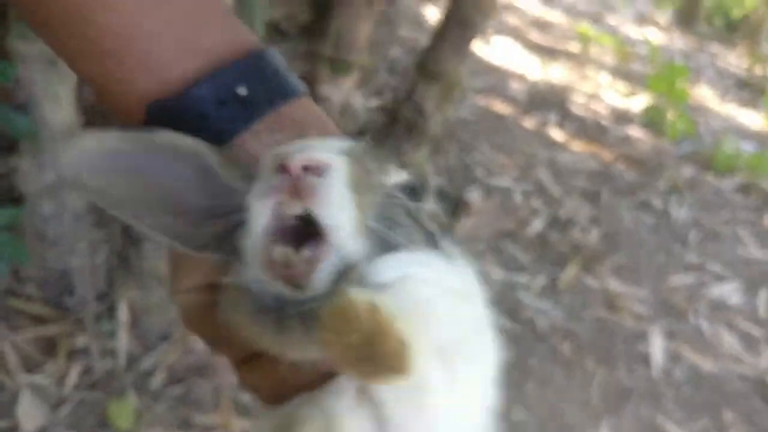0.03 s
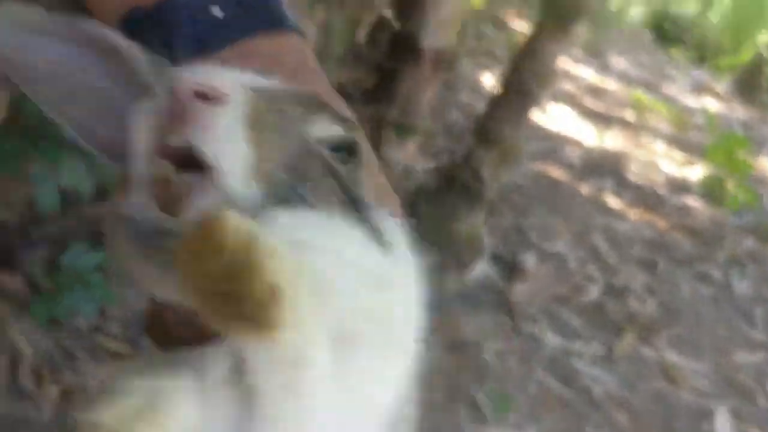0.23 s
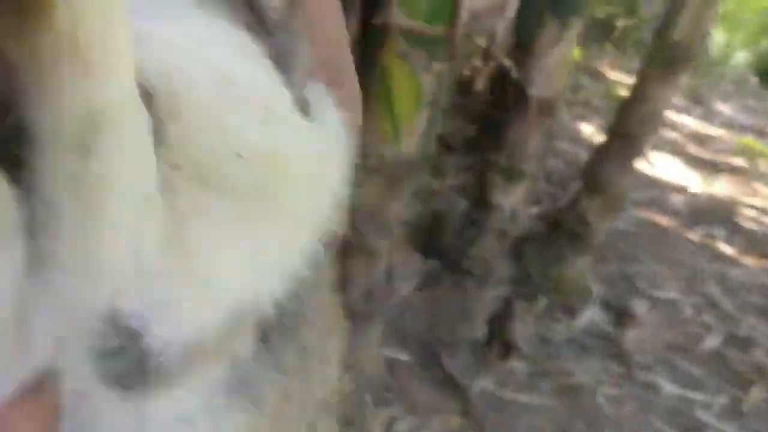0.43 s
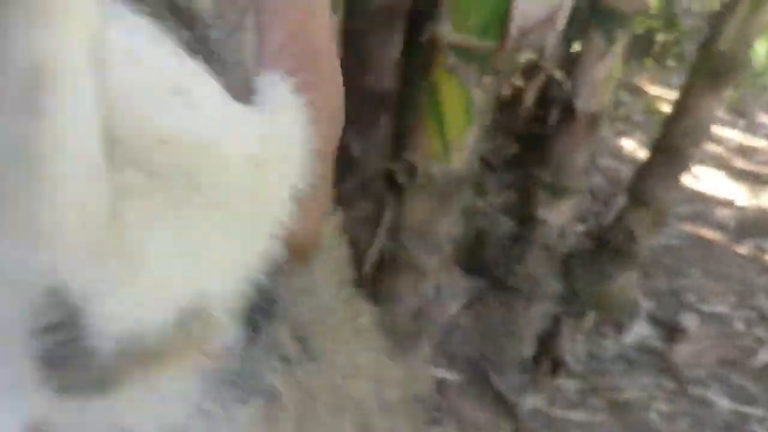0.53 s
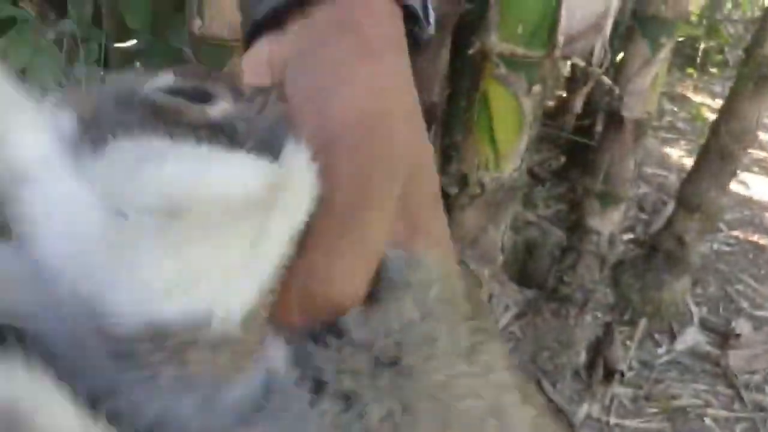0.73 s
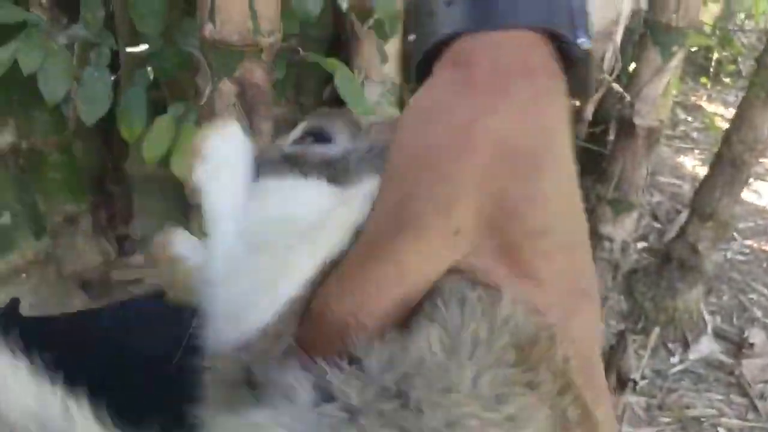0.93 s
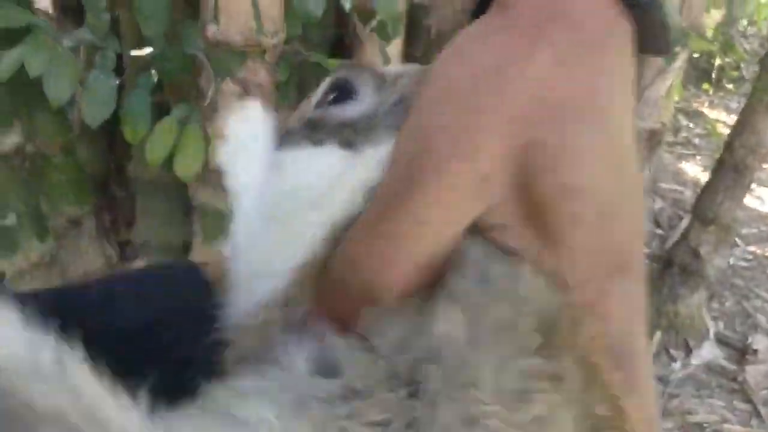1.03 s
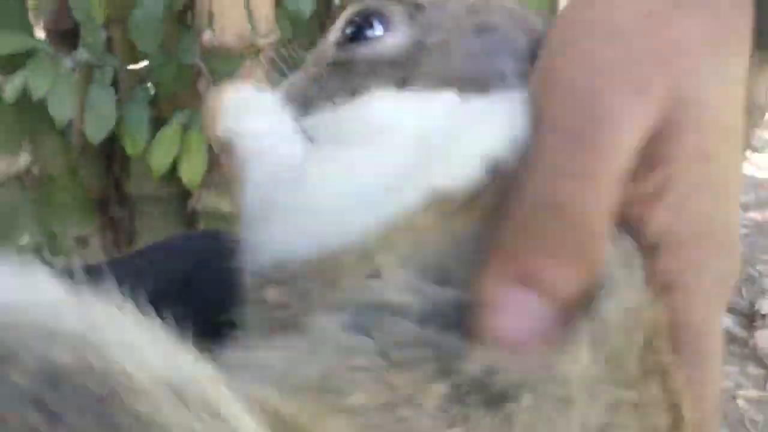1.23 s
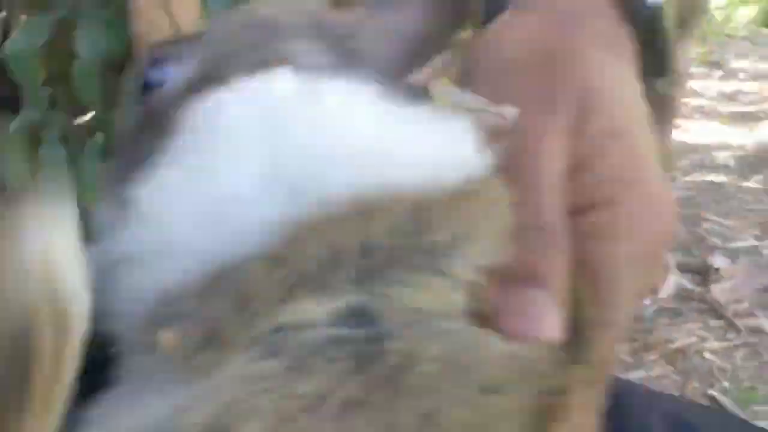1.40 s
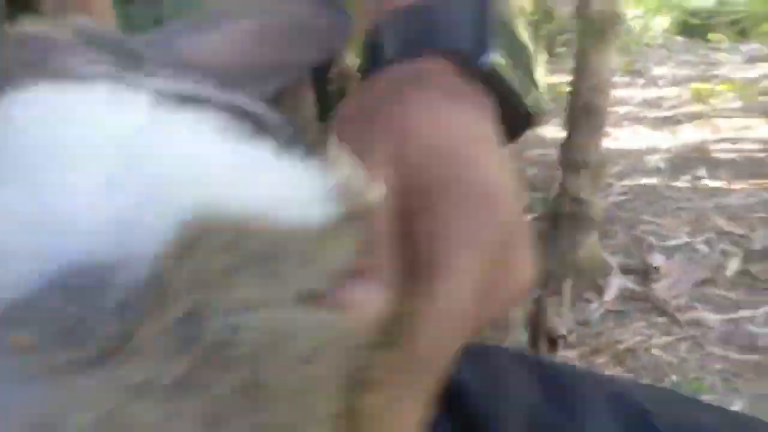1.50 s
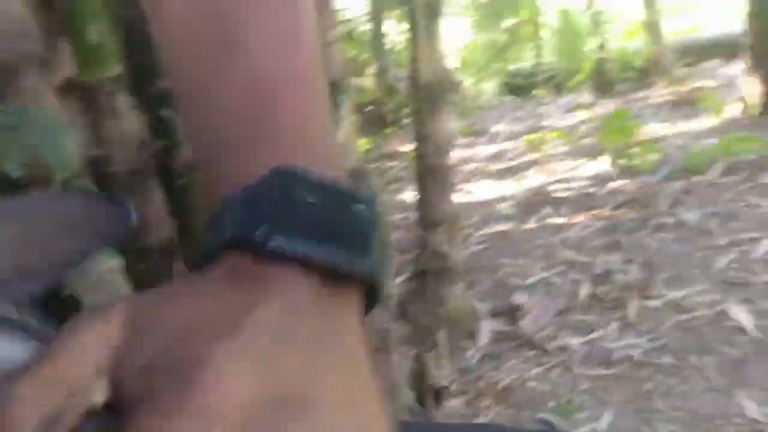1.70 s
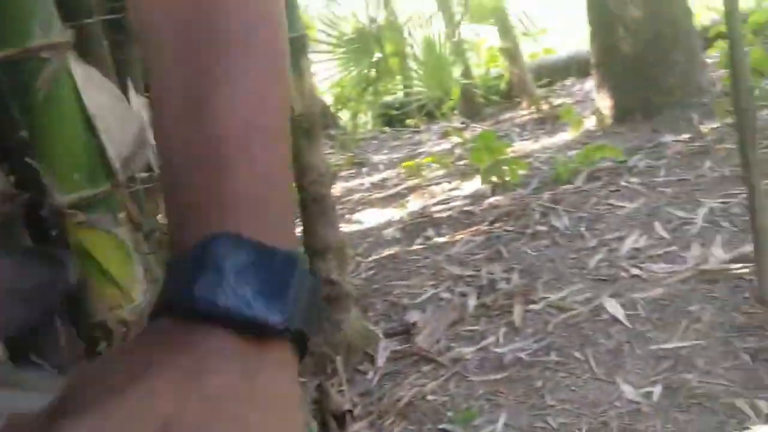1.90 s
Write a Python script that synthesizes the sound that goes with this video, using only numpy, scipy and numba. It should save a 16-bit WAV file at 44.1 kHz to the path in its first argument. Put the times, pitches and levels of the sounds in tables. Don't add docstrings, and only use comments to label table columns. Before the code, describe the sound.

A rabbit held very close to a handheld phone microphone gives three loud, piercing squeals with short gaps, the first clean then rasping, the later ones rougher; faint woodland rumble, leaf hiss and slight handling rustles lie beneath.

```python
import sys
import numpy as np
from scipy import signal
from scipy.fft import rfft, irfft, next_fast_len
from scipy.io import wavfile
from scipy.ndimage import uniform_filter1d
from numba import njit

SR = 44100
rng = np.random.default_rng(int(sys.argv[2]) if len(sys.argv) > 2 else 0)


def voltage_ratio(level):
    return 10 ** (np.asarray(level, float) / 20)


def materialize(psi):
    bounded = np.clip(np.atleast_2d(psi).T, -1, 1)
    quanta = np.round(bounded * 32767).astype(np.int16)
    wavfile.write(sys.argv[1], SR, quanta)


N = 85995


def curve(rows, col, smooth_s=0.0013):
    rows = np.array(rows, float)
    line = np.interp(np.arange(N) / SR, rows[:, 0], rows[:, col])
    return uniform_filter1d(line, max(int(smooth_s * SR), 1))


def colour(x, points):
    p, n = np.array(points, float), next_fast_len(N + 2048)
    hz = np.maximum(np.arange(n // 2 + 1) * SR / n, 1)
    gain_db = np.interp(np.log(hz), np.log(p[:, 0]), p[:, 1])
    return irfft(rfft(x, n) * voltage_ratio(gain_db), n)[..., :N]


def unit(x):
    return x / np.sqrt(np.mean(x ** 2))


def still(hz):
    return np.full(N, float(hz))


@njit
def svf(x, hz, width):
    y, b, l = np.empty(len(x)), 0., 0.
    for i in range(len(x)):
        g, k = np.tan(np.pi * hz[i] / SR), width / hz[i]
        v = (b + g * (x[i] - l)) / (1 + g * (g + k))
        b, l, y[i] = 2 * v - b, l + 2 * g * v, k * v
    return y


def twice(x, hz, width):
    return svf(svf(x, hz, 1. * width), hz, 1. * width)


def walk(rate_hz):
    slow_filter = signal.butter(2, rate_hz, fs=SR, output="sos")
    return unit(signal.sosfilt(slow_filter, rng.standard_normal(N + SR))[SR:])


def vocal_folds(chaos, beat):
    # (time [s], pitch [Hz])
    fold_pitch = [(.14, 1200), (.17, 1464), (.2, 1616), (.25, 1657), (.325, 1502), (.385, 1692),
                  (.43, 1623), (.462, 1665), (.476, 1539), (.49, 1599), (.515, 1830), (.527, 1479),
                  (.56, 1576), (.585, 1477), (.613, 1337), (.632, 1026), (.78, 909.8), (.826, 1304),
                  (.88, 1673), (.94, 1741), (.97, 1554), (1.08, 1552), (1.15, 1384), (1.165, 853),
                  (1.19, 718.7), (1.408, 535.1), (1.428, 1139), (1.437, 1651), (1.48, 1871), (1.543, 1837),
                  (1.556, 1748), (1.62, 1815), (1.685, 1762), (1.725, 1495), (1.76, 1350)]
    # (time [s], cycles [count])
    sub_beats = np.array([
        (0, 2),
        (1.3, 9),
        (1.5, 4),
    ])
    jitter, shimmer, chaos_hz = .3, 0.46, 591.8
    t = np.arange(N) / SR
    hz = curve(fold_pitch, 1, 0.011)
    steady = 2 * np.pi * np.cumsum(hz) / SR
    phase = steady + 2 * np.pi * np.cumsum(hz * jitter * chaos * walk(chaos_hz)) / SR

    folds = np.zeros(N)
    for k in range(1, 17):
        below_17k = np.clip((17000 - k * hz) / 1000, 0, 1)
        folds += k ** -0.85 * np.cos(k * phase) * below_17k

    now = np.searchsorted(sub_beats[:, 0], t, "right") - 1
    slow = phase / sub_beats[now, 1] + 2.23 * chaos * walk(90)
    pulse = 5.74 * np.exp(2 * (np.cos(slow) - 1))
    folds = folds * (1 + shimmer * chaos * np.tanh(walk(chaos_hz)))
    return folds * (1 + beat * (pulse - 1)), phase, steady


def upper_head(air):
    # (mean centre [Hz], width [Hz], mean level [dB])
    bones = [(1000, 1800, -17), (8200, 3500, -13), (12000, 7000, -20)]
    # (time [s], mouth resonance [Hz], mouth level [dB], nose level [dB])
    upper_mouth = [(.15, 4910, -14.5, -0.5), (.49, 4970, -31.5, 19), (.58, 4940, 8, 4.5),
                   (.79, 3960, 15.5, 19.5), (.87, 5540, 2, -6), (.98, 5120, 1.5, -23), (1.1, 5160, 2, 13.5),
                   (1.17, 5310, 8.5, 16), (1.42, 5260, -2, -4), (1.47, 5020, 3.5, 12),
                   (1.6, 5220, -5.5, -32.5), (1.67, 5490, 6, 0.5), (1.76, 4840, 5, 14.5)]
    ringing = np.zeros(N)
    for f, width_hz, db in bones:
        wavering_db = db + 1.78 * walk(29.5)
        wavering_hz = f * (1 + 0.15 * walk(5.4))
        ringing += voltage_ratio(wavering_db) * twice(air, wavering_hz, width_hz)
    palate = voltage_ratio(curve(upper_mouth, 2)) * twice(air, curve(upper_mouth, 1), 890)
    nose = voltage_ratio(curve(upper_mouth, 3)) * twice(air, still(3343), 757)
    return ringing + palate + nose


def rabbit():
    # (time [s], mouth resonance [Hz], chaos [0-1], sub-beat depth [0-1], brightness [dB])
    throat = [(.14, 3140, 0.03, 0, -38), (.47, 3140, .01, 0.01, -29), (.49, 3210, 0.01, 0.07, -19),
              (.505, 3225, 0.22, 0.6, -37), (.525, 2990, 0.17, 0.93, -4.5), (.556, 3113, 0.37, 0.89, -2),
              (.585, 3166, .2, 0.46, -9), (.63, 2400, .2, 0, -8), (.78, 970, 0.8, 0.7, -23.5),
              (.82, 1842, 0.82, 0, -27.5), (.87, 2420, 0.87, 0.36, -16), (.95, 2668, 0.66, 0.37, -12.5),
              (.995, 2387, 0.7, 0, -13), (1.06, 2434, 0.51, 0.11, -7.5), (1.15, 2277, 0.57, 0.27, -12.5),
              (1.19, 2250, 0.28, 0.3, -4), (1.41, 960, .1, 0.1, -14), (1.436, 1910, 0.34, 0, -12),
              (1.478, 2247, .35, 0.23, -26.5), (1.486, 1983, 0.03, 0, -9), (1.542, 1830, 0.02, 0, -3.5),
              (1.552, 2116, 0.14, 0.4, -15), (1.61, 2265, 0.22, 0.27, -15.5), (1.65, 2530, 0.8, 0.6, -14),
              (1.69, 2315, .6, 1, -11.5), (1.715, 2270, 0.41, 0.3, -15.5), (1.76, 2150, 0.69, 1, -10)]
    # (time [s], ring [dB], chest [dB])
    ring_and_chest = [(.47, -33, -40), (.55, -3.5, -21.5), (.79, -6, -14), (.87, 1, -27.5), (1.0, -5, -16),
                      (1.06, 17, -14), (1.17, 13.5, -9), (1.42, -8, -7.5), (1.5, -8.5, -22),
                      (1.6, 4.5, -9.5), (1.65, -4, -13.5), (1.75, 9, -5.5)]
    # (time [s], level [dB])
    effort = [(.13, -72.5), (.15, -34.5), (.178, -25), (.31, -27), (.38, -20), (.43, -22), (.478, -21),
              (.505, -10), (.57, -13), (.617, -22), (.632, -33.5), (.65, -94), (.772, -56.5), (.789, -24),
              (.82, -17.5), (.855, -11.5), (.945, -15.5), (.985, -23.5), (1.058, -16), (1.1, -18),
              (1.165, -18.5), (1.19, -38), (1.205, -48), (1.406, -98), (1.414, -31.5), (1.468, -22),
              (1.535, -22), (1.57, -15), (1.67, -19), (1.705, -18), (1.74, -25.5), (1.765, -45),
              (1.78, -75)]
    chaos, beat = np.clip(curve(throat, 2), 0, 1), curve(throat, 3)
    folds, phase, steady = vocal_folds(chaos, beat)

    breath = (chaos + 0.014) * (1 + np.cos(phase)) * rng.standard_normal((3, N))
    air = folds + voltage_ratio(-12) * breath[0]
    airy = folds + voltage_ratio(9) * (0.48 * breath[0] + breath[1:])

    mouth_hz = curve(throat, 1) * (1 + 0.032 * chaos * walk(91))
    mouth = twice(air, mouth_hz, 520)
    wide_mouth = 1.08 * beat * twice(air, 0.97 * mouth_hz, 1100)
    skull = voltage_ratio(curve(throat, 4)) * np.array([upper_head(a) for a in airy])
    fold_tone = voltage_ratio(-9) * np.cos(steady + 2.36 * chaos * walk(130)) * voltage_ratio(-6 * chaos)
    narrow_ring = voltage_ratio(curve(ring_and_chest, 1)) * twice(air, mouth_hz, 300)
    chest = voltage_ratio(curve(ring_and_chest, 2)) * twice(airy.mean(0), still(1000), 1800)

    voice = mouth + wide_mouth + skull + fold_tone + narrow_ring + chest
    voice = colour(voice, [(250, -5), (600, -7), (6100, 3), (6600, -3), (7200, 3.5)])
    voice = voice / np.sqrt(uniform_filter1d(np.mean(voice ** 2, 0), size=900))
    return voice * voltage_ratio(curve(effort, 1))


def at_port(voice, side):
    # (frequency [Hz], level [dB])
    port_balance = [(900, 4), (1600, -12.5), (2300, -2), (4000, 1), (6500, 8.5), (8000, 6), (15000, 21.5)]
    # (time [s], at 4-7 kHz [dB], at 2-3.4 kHz [dB])
    head_turn = [(.2, 5.5, 0), (.35, 5, -7.5), (.45, 4.5, 2.5), (.57, 4, -2.5), (.85, 1.5, -0.5),
                 (.95, -14, 12), (1.02, -9, 0.5), (1.17, -5.5, 3), (1.44, -6.5, 1.5), (1.53, 10, 2),
                 (1.68, -6, 1)]
    # (time [s], phase [rad])
    phase_swing = [(.91, 0.5), (.98, -2), (1.15, -2), (1.3, 0.5), (1.42, 3), (1.46, 3), (1.5, 0.5)]
    # (frequency [Hz], phase [rad])
    left_lead = [(900, 0.63), (1600, 3.7), (2240, 5.36), (3360, 6.79), (5700, 10.75), (16000, 23.4)]
    n = next_fast_len(N + 2048)
    high = colour(voice, [(3700, -21), (4400, 0), (6800, 0), (7400, -30)])
    middle = colour(voice - high, [(1850, -40), (2050, 0), (3300, 0), (3600, -40)])
    swung = np.real(signal.hilbert(middle, n)[:N] * np.exp(.5j * side * curve(phase_swing, 1)))

    high_gain = voltage_ratio(side * curve(head_turn, 1) / 2)
    middle_gain = voltage_ratio(side * curve(head_turn, 2) / 2)
    turned = voice + (high_gain - 1) * high + middle_gain * swung - middle
    heard = colour(turned, [(f, side * d / 2) for f, d in port_balance])
    lead = np.interp(np.arange(n // 2 + 1) * SR / n, *np.array(left_lead, float).T)
    return irfft(rfft(heard, n) * np.exp(.5j * side * lead), n)[:N]


def trunk_echo(voice):
    t60_s, first_return_s = 0.18, .004
    tail = np.arange(SR // 2) / SR
    fade = np.exp(-np.log(1000) * tail / t60_s) * (tail > first_return_s)
    trunks = rng.standard_normal(len(tail)) * fade
    trunks = trunks / np.sqrt(np.sum(trunks ** 2))
    return signal.fftconvolve(svf(voice, still(2400), 2500.), trunks)[:N]


def rustles():
    # (time [s], level [dB], centre [Hz])
    brushes = [
        (0.02, -51.5, 1300),
        (1.3, -34, 56),
        (0.347, -39.5, 212),
        (0.67, -42, 147.6),
        (1.291, -80, 2510),
    ]
    t, out = np.arange(N) / SR, np.zeros(N)
    for s, db, hz in brushes:
        puff = np.exp(-((t - s) / 0.016) ** 2)
        out += voltage_ratio(db) * puff * unit(svf(rng.standard_normal(N), still(hz), 1. * hz))
    return out


def wood():
    # (time [s], level [dB])
    leaf_breeze = [(0, 1.5), (.2, 4), (.65, 0.5), (1.22, -7), (1.3, 2.5), (1.95, -2.5)]
    # (frequency [Hz], level [dB])
    wood_colour = [(32, -2), (50, 2), (215, -11), (400, -17.5), (950, -19.5), (2100, -24.5), (7500, -47.5),
                   (13000, -41)]
    out, gust_db = np.zeros((2, N)), 1 * walk(1.0)
    for hz in 40 * 2 ** np.arange(0, 9, .5):
        mid, side = (svf(rng.standard_normal(N), still(hz), hz / 2.9) for _ in range(2))
        spread = np.clip(hz / 1400, .3, 1)
        swell_db = gust_db + (hz > 300) * curve(leaf_breeze, 1) + 4.5 * walk(23)
        both_ports = mid + spread * side * np.array([[1], [-1]])
        out = out + hz ** -.5 * voltage_ratio(swell_db) * both_ports
    flat = colour(out, [(20, 0), (20000, 30)])
    out = voltage_ratio(-39.5) * unit(colour(flat, wood_colour)) + rustles()
    left = [(900, 1.25), (2400, -1.5), (8000, 0)]
    right = [(f, -d) for f, d in left]
    return np.array([colour(out[0], left), colour(out[1], right)])


def scene():
    ports = []
    for side, voice in zip((1, -1), rabbit()):
        ports.append(1.348 * at_port(voice, side) + voltage_ratio(-22.5) * trunk_echo(voice))
    return np.array(ports) + wood()


def band_limit(x):
    return signal.sosfilt(signal.butter(12, 16000, fs=SR, output="sos"), x)


def record(dry):
    dry = signal.sosfilt(signal.butter(2, 35, "high", fs=SR, output="sos"), dry)
    dry = dry / (1 + np.abs(dry / .97) ** 6) ** (1 / 6)
    dry = signal.sosfilt(signal.ellip(10, .2, 80, 15900, fs=SR, output="sos"), dry)
    return band_limit(dry)


dry = scene()
out = record(dry)
materialize(out)
```